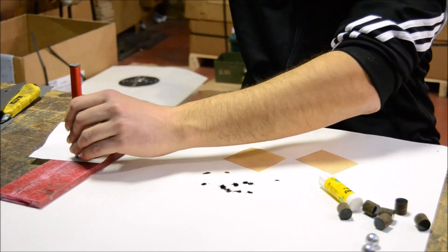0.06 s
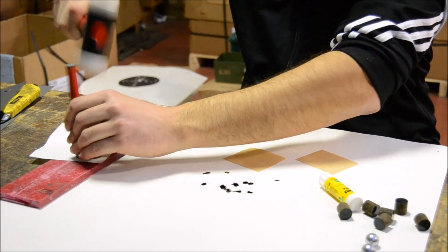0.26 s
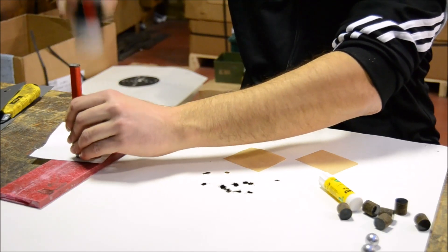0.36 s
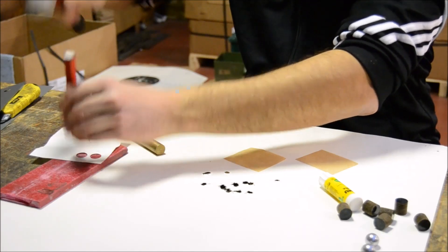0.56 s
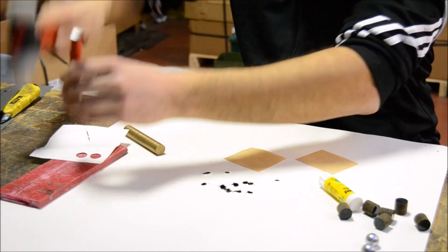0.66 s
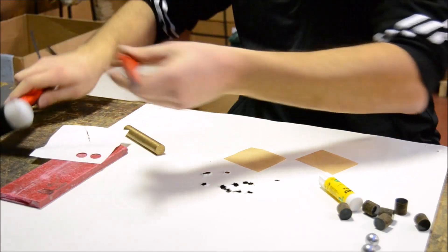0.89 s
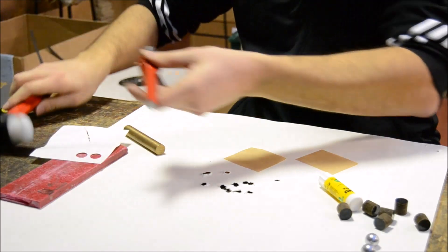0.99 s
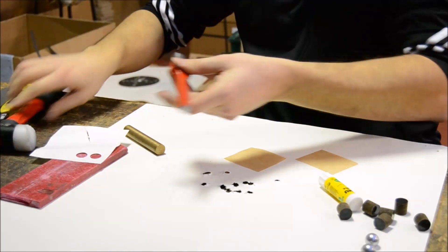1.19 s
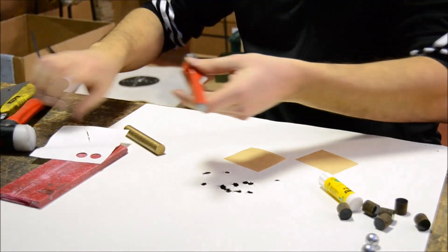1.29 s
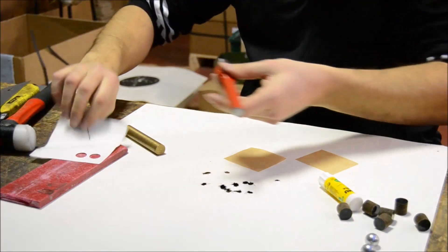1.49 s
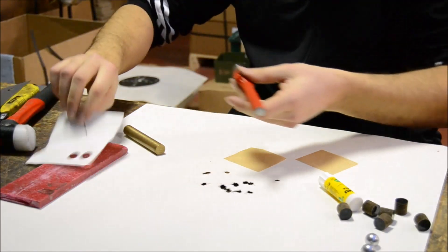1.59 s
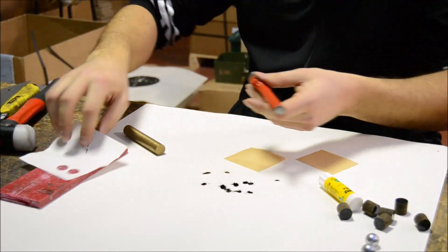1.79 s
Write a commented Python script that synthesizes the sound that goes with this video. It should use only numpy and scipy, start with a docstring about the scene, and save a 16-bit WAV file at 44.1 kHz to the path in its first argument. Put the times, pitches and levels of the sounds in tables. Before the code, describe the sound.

A hammer strikes a steel punch once at about 0.25 seconds, a sharp, distorted crack close by, with a metallic ring and workshop echo. At 0.8 seconds the punch rubs briefly out of paper. From about 1 to 1.3 seconds the hammer lands on the bench and rocks to rest in quick, duller knocks. From 1.5 seconds a paper sheet slides faintly with a few tiny ticks.

```python
"""Hammer and hollow punch in a workshop

Close to a workbench, a hammer hits a hollow steel punch: the steel rings, the room echoes,
and the blow overloads the microphone. The punch rubs as it is pulled out of the paper,
the hammer is put down and rocks to rest on the bench, and a hand slides the punched sheet away."""
import sys
import numpy as np
from scipy import signal
from scipy.fft import rfft, irfft, next_fast_len
from scipy.io import wavfile

SR = 44100
rng = np.random.default_rng(int(sys.argv[2]) if len(sys.argv) > 2 else 0)


def generate_wav(signal):
    """Clip the signal to [-1, 1] and save it as 16-bit WAV at the path in sys.argv[1]."""
    frames = np.transpose(np.atleast_2d(signal))
    scaled = np.clip(frames, -1, 1) * 32767
    pcm = np.round(scaled).astype(np.int16)
    wavfile.write(sys.argv[1], SR, pcm)


N = 81585


def amp(db):
    """Decibels to gain."""
    return 10 ** (np.asarray(db) / 20)


def unit(x):
    """Scale to rms 1."""
    return x / np.sqrt(np.mean(x ** 2) + 1e-20)


def along(points, hz):
    """Interpolate (frequency, value) points on a log frequency axis."""
    freqs, values = np.transpose(points)
    return np.interp(np.log(hz + 1), np.log(freqs + 1), values)


def clock():
    """Seconds at each sample."""
    return np.arange(N) / SR


def fade(t, t60):
    """Exponential decay, 60 dB down after t60 seconds."""
    return np.exp(-np.log(1000) * np.maximum(t, 0) / t60)


def at(start, x):
    """Delay x by start seconds."""
    return np.pad(x, (round(start * SR), 0))[:N]


def filtered(x, response):
    """Apply a frequency response to x."""
    size = next_fast_len(N + SR // 2)
    return irfft(rfft(x, size) * response(np.fft.rfftfreq(size, 1 / SR)), size)[:N]


def soften(x, hz, order=2):
    """Causal low-pass."""
    return signal.sosfilt(signal.butter(order, hz, fs=SR, output="sos"), x)


def thin(x, low_hz):
    """Gentle high-pass."""
    return filtered(x, lambda hz: (1j * hz / (1j * hz + low_hz)) ** 2)


def band_limit(x, top_hz):
    """Steep low-pass."""
    return filtered(x, lambda hz: 1 / (1 + (hz / top_hz) ** 50))


def noise(spectrum):
    """Coloured noise of rms 1: the spectrum sets only its shape."""
    return unit(filtered(rng.standard_normal(N), lambda hz: amp(along(spectrum, hz))))


def ring(modes):
    """Damped sines, about a decibel different at every contact."""
    t = clock()
    return sum((-1) ** k * amp(db + rng.normal()) * np.sin(2 * np.pi * hz * t) * fade(t, t60)
               for k, (hz, db, t60) in enumerate(modes))


# Room tone of the workshop (frequency [Hz], relative level [dB])
AIR_SPECTRUM = [(20, -20), (45, -10.5), (80, -7), (170, -4.5), (300, -2.5), (500, -4.5), (1100, -4.5),
                (2500, -11.5), (5000, -20), (10000, -32), (12000, -55.5)]

def room_tone():
    """Quiet workshop noise with a faint 300 Hz hum."""
    return amp(-62.5) * noise(AIR_SPECTRUM) + amp(-71) * np.sin(2 * np.pi * 300 * clock())


# Reverberation of the workshop (frequency [Hz], t60 [s])
ROOM_DECAY = [(60, .55), (250, 0.71), (1000, 0.59), (2000, 0.76), (4000, 0.66), (7000, .48), (11000, 0.21)]

def room_tail(x):
    """Let each frequency of x die at the workshop's speed."""
    hz, t, bands = signal.stft(x, SR, nperseg=256)
    decay = fade(t, along(ROOM_DECAY, hz)[:, None])
    return signal.istft(bands * decay, SR, nperseg=256)[1][:N]


def room_echo(x):
    """The workshop's answer to a small sound; near surfaces weight its start."""
    answer = at(0.0025, room_tail(rng.standard_normal(N)) * fade(clock(), t60=0.91))
    return signal.fftconvolve(x, answer / np.linalg.norm(answer))[:N]


# Paper and skin rubbing on the bench
# (time [s], level [dB], rise [s], hold [s], t60 [s], body [dB], sheen [dB])
STROKES = [(0.828, -39, 0.0048, 0.005, 0.049, 4, -11), (0.858, -50, .01, 0.016, 0.075, -21.5, -7),
           (0.967, -54.5, 0.04, .012, .08, -0.5, -31), (1.083, -50.5, 0.011, 0.0025, 0.11, -12, -21),
           (1.1115, -38.5, 0.0073, 0.0035, 0.12, 8.5, -10.5), (1.456, -67, .015, .015, .2, 5.5, -3.5),
           (1.54, -69.5, 0.054, 0.049, 0.096, 3, 5.5), (1.709, -68, .005, .02, .2, -6, 4),
           (1.775, -66, .005, 0.013, .22, -2, -2)]
# Hiss, midrange body and high sheen of the rubbing (frequency [Hz], relative level [dB])
HISS_SPECTRUM = [(100, -50), (800, -15.5), (2500, -8), (3700, 2.5), (4400, 6), (5800, 5.5), (7500, -0.5),
                 (10000, -2.5), (11000, -9.5), (12000, -26)]
BODY_SPECTRUM = [(100, -45.5), (350, -10.5), (550, 10), (750, -7.5), (1150, 3), (1450, -8.5), (1900, -1),
                 (2800, -7.5), (4000, -16.5), (8000, -38)]
SHEEN_SPECTRUM = [(5000, -25.5), (7500, -13), (9000, 3), (10300, -0.5), (11500, -23.5)]
# Single ticks of the paper (time [s], level [dB])
PAPER_TICKS = [(0.836, -37), (1.673, -53.5), (1.718, -58.5), (1.7234, -44.5)]

def paper(snaps_per_s=170):
    """Punch and hand rub the sheet: grainy strokes of friction, crinkling with tiny snaps."""
    t, rubbing = clock(), np.zeros(N)
    hiss, body, sheen = noise(HISS_SPECTRUM), noise(BODY_SPECTRUM), noise(SHEEN_SPECTRUM)
    snaps = 1.0 * (rng.random(N) < snaps_per_s / SR)
    crinkle = unit(signal.fftconvolve(snaps, fade(t, t60=0.0068))[:N])
    flutter_db = unit(soften(rng.standard_normal(N), hz=300))
    grain = unit(amp(flutter_db) + amp(-8.5) * crinkle)
    for start, db, rise, hold, t60, body_db, sheen_db in STROKES:
        stroke = np.clip((t - start) / rise, 0, 1) * fade(t - start - rise - hold, t60)
        friction = hiss + amp(body_db) * body + amp(sheen_db) * sheen
        rubbing += amp(db) * stroke * grain * friction
    for start, db in PAPER_TICKS:
        rubbing += amp(db) * at(start, fade(t, t60=0.012)) * (hiss + amp(-5.5) * body)
    return thin(rubbing + amp(-5) * room_echo(rubbing), low_hz=300)


# The hammer meets the bench (time [s], level [dB], low-pass [Hz], thud [dB], echo [dB], clack [dB])
CONTACTS = [(0.9556, -41.5, 1608, 6, -7, -25), (1.0337, 1.5, 2910, -25.5, -20.5, -12),
            (1.0824, -7.5, 1900, -22, -16.5, -39), (1.1445, -2.5, 960, -12.5, -18, -34),
            (1.1635, -12.5, 683, -6, -14, -34), (1.1934, -10, 790, -9, -17, -27),
            (1.227, -22.5, 836, 1, -14, -17), (1.249, -25, 580, -1, -8, -37)]
# Hammer and bench top ringing together, and the thud below (frequency [Hz], level [dB], t60 [s])
CONTACT_MODES = [(460, -15, .035), (562.4, -6.5, 0.038), (725.6, -11.5, 0.062), (972, -15, 0.025),
                 (1052, -9, 0.034), (1244, -4, 0.034), (1507, -2, 0.016), (1802, -10.5, 0.024)]
THUD_MODES = [(85, -13.5, 0.029), (135, -11, 0.057), (215, -5.5, 0.041), (340, -8, .03)]
# The head's hard edge, the boards' dense ring, the room's answer (frequency [Hz], relative level [dB])
CLACK_SPECTRUM = [(500, -5.5), (1700, 7.5), (2700, -10.5), (4200, 7), (5800, -19.5), (8000, -23),
                  (11000, -22)]
BOARD_SPECTRUM = [(60, -34), (250, -26.5), (450, -6), (800, 1.5), (1300, 0), (1900, -2.5), (2800, -18),
                  (4000, -35.5), (8000, -53.5)]
KNOCK_ECHO_SPECTRUM = [(50, -19.5), (150, -12), (300, -6), (520, 0), (800, -3.5), (1150, 3), (1700, -6),
                       (2600, -17), (3800, -29), (9000, -34.5)]

def rocking_hammer():
    """The hammer lands on the bench and rocks to rest; the later, softer contacts are duller."""
    t, knocks = clock(), np.zeros(N)
    near_surfaces = fade(t, t60=0.8)  # they answer first, so the echo gets an extra decay
    for start, db, bright_hz, thud_db, echo_db, clack_db in CONTACTS:
        clack = amp(clack_db) * noise(CLACK_SPECTRUM) * fade(t, t60=0.005)
        boards = amp(-13) * noise(BOARD_SPECTRUM) * fade(t, t60=0.04)
        echo = amp(echo_db) * room_tail(noise(KNOCK_ECHO_SPECTRUM)) * near_surfaces
        knock = soften(ring(CONTACT_MODES) + boards + echo, bright_hz, order=3)
        thud = amp(thud_db) * ring(THUD_MODES)
        knocks += amp(db) * at(start, knock + clack + thud)
    return thin(knocks, low_hz=110)


# The bang close up, and its echo around the workshop (frequency [Hz], relative level [dB])
BANG_SPECTRUM = [(40, -31), (200, -22.5), (600, -9), (900, -4), (1180, 2.5), (1700, -3.5), (2400, -7),
                 (3200, -3.5), (5000, -20.5), (10500, -34.5), (13000, -44.5)]
BLOW_ECHO_SPECTRUM = [(40, -37), (110, -29), (250, -12), (450, -1.5), (750, -2.5), (1150, 4.5),
                      (1600, -0.5), (2600, -5.5), (4200, -17), (6000, -26), (10500, -23), (12000, -60.5)]
# Low and middle tones colouring the blow's echo (frequency [Hz], level [dB], t60 [s])
BLOW_TONES = [(65, -35, .2), (125, -32, .25), (178, -48, 2.2), (339, -24, .34), (412, -26, .38),
              (792, -25, .38), (1127, -17, .48), (1186, -16, .45), (1245, -20, .5), (1452, -27, .66),
              (1529, -42, 1.2), (1954, -29, .62), (2304, -25, .45)]
# The steel punch ringing (frequency [Hz], level [dB], t60 [s])
PUNCH_MODES = [(6293, -35, .42), (7251, -32, .47), (8640, -25, .13), (9130, -22, .17), (9641, -33, .28),
               (10220, -24, .29), (11190, -38, .22)]
# Hard cracks that break through the choked microphone (time [s], level [dB], width [ms])
OVERLOAD_CRACKS = [(0.2415, 7, 0.15), (0.2423, 23.5, 0.26), (0.2446, 3, 0.13), (0.2479, 6.5, 0.23),
                   (0.2546, 3, 0.17), (.2568, -4, .2), (.259, -2.5, 0.41)]

def hammer_blow(start_s=0.2418, choke_s=0.0171, echo_build_s=0.023):
    """A bang, ringing steel and a long echo; the close microphone first chokes and cracks."""
    t = clock()
    bang = amp(12) * noise(BANG_SPECTRUM) * fade(t, t60=0.069)
    echo = amp(-5.5) * room_tail(noise(BLOW_ECHO_SPECTRUM)) * (1 - np.exp(-t / echo_build_s))
    blow = bang + echo + ring(BLOW_TONES) + ring(PUNCH_MODES)
    choke = np.where(t < choke_s, amp(-53), 1)
    pulses = sum(at(start, amp(db) * np.clip((width_ms * 1e-3 - t) * SR, 0, 1))
                 for start, db, width_ms in OVERLOAD_CRACKS)
    cracks = filtered(pulses, lambda hz: 1j * hz / (1j * hz + 650))  # high-pass: each pulse sags
    return at(start_s, blow * choke) + soften(cracks, hz=9000)


def scene():
    """Everything at one microphone close to the bench."""
    return (hammer_blow() + rocking_hammer() + paper() + room_tone())[None]


def record(dry):
    """The microphone loses the top treble; the recorder clips the peaks and limits the band."""
    microphone = band_limit(dry[0], top_hz=11350)
    clipped = np.clip(microphone, -1, 1)
    return band_limit(clipped, top_hz=16000)[None]


dry = scene()
out = record(dry)
generate_wav(out)
```